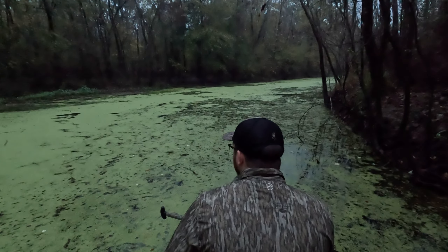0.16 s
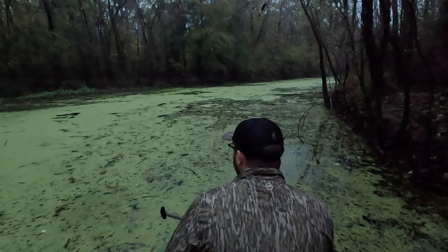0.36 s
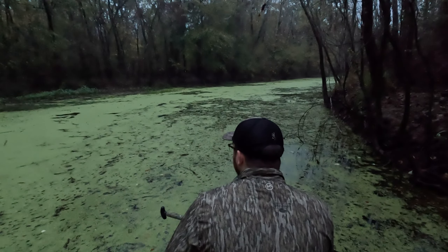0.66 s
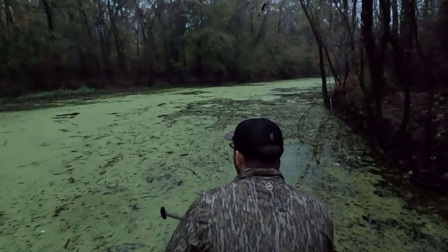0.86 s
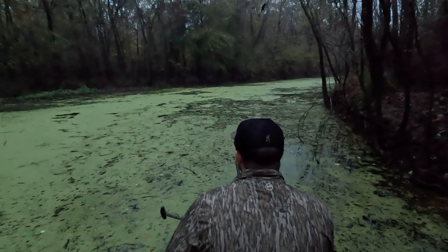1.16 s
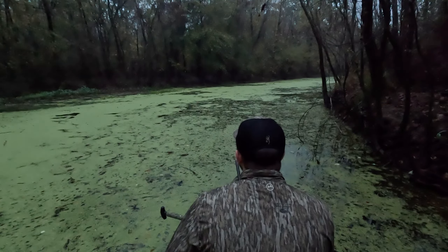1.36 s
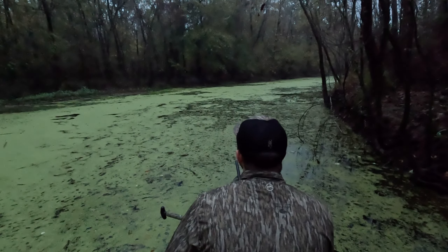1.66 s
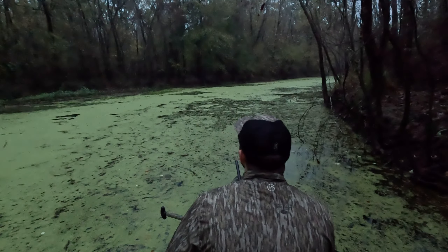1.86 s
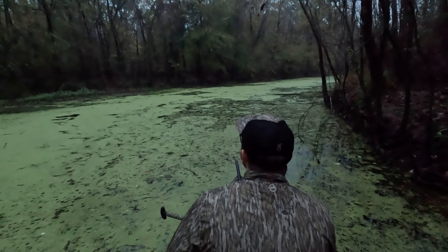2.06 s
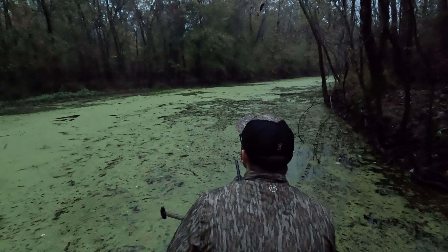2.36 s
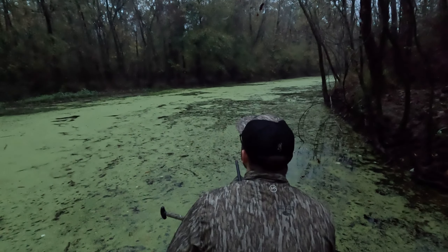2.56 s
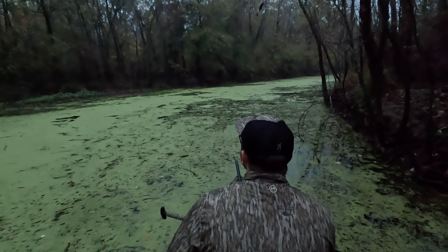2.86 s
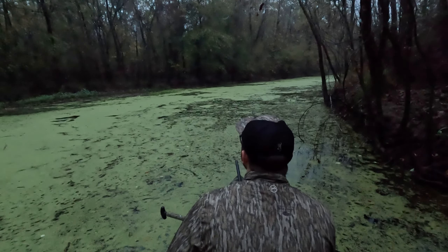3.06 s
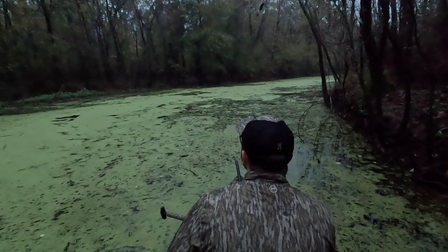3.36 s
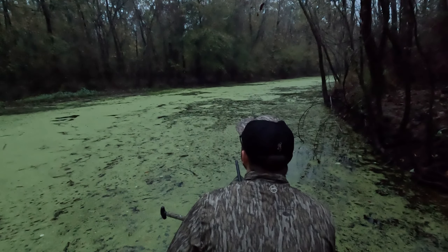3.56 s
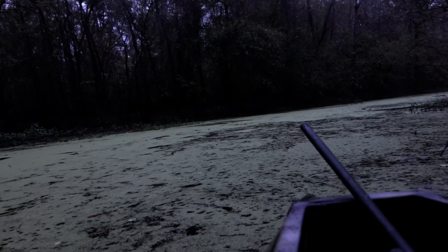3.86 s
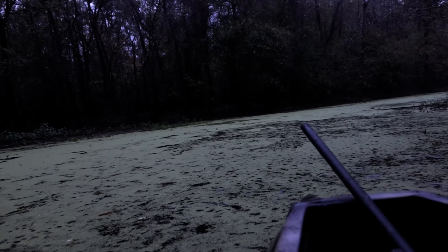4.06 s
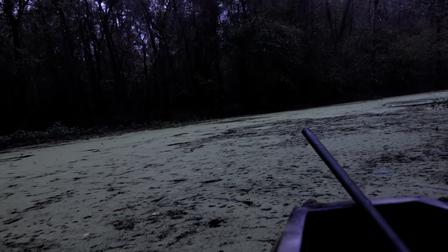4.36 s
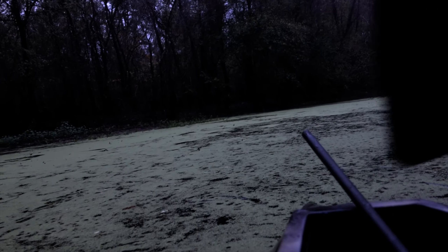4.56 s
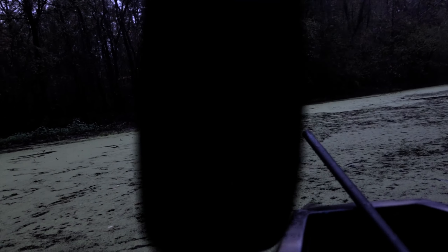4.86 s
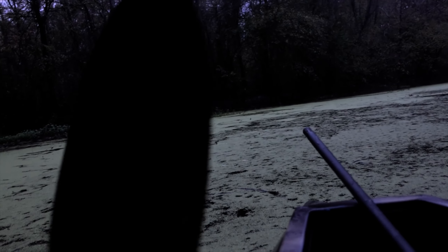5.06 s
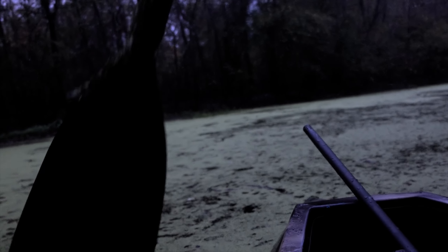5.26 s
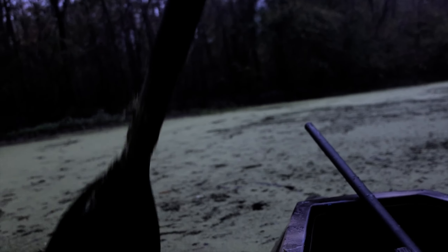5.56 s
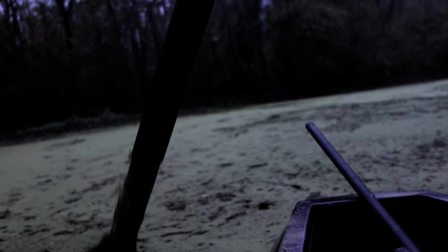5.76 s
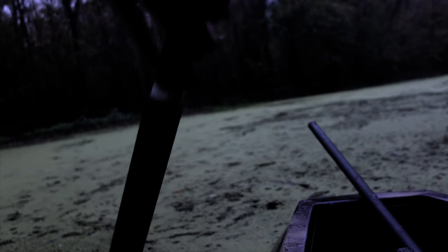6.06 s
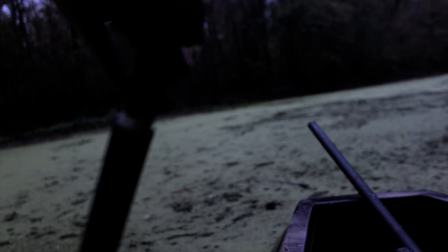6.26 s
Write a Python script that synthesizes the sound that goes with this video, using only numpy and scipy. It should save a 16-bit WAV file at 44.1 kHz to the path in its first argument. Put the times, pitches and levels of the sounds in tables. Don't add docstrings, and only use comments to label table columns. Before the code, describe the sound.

A shrill, steady cricket chorus fills a wooded swamp, heard almost mono through a sensitive distant microphone. Crows caw hoarsely, waterfowl whistle and honk, frogs grunt and sharp drops crack from leaves, with tree echoes. Just before four seconds it cuts to a much quieter, wide stereo boat view: cloth rustles, the paddle drips and splashes, water gurgles faintly, and the hollow hull is knocked, loudest near five and a half seconds.

```python
import sys
import numpy as np
from scipy import signal
from scipy.fft import rfft, irfft, next_fast_len
from scipy.io import wavfile

SR = 44100
rng = np.random.default_rng(int(sys.argv[2]) if len(sys.argv) > 2 else 0)


def pcm_store(signal):
    levels = np.round(np.clip(np.atleast_2d(signal), -1, 1) * 32767)
    wavfile.write(sys.argv[1], SR, levels.astype(np.int16).T)


def magnitude_from_level(level_db):
    exponent = np.asarray(level_db, float) / 20
    return 10 ** exponent


N = 282681
TIME = np.arange(N) / SR
CUT_S = 3.893
EDGE_DB = -4


def rms_one(x):
    return x / np.sqrt(np.mean(x ** 2) + 1e-20)


def in_time(rows):
    moments, *columns = np.transpose(rows)
    return [np.interp(TIME, moments, column) for column in columns]


def gate(start, end, edge):
    return np.clip(np.minimum(TIME - start, end - TIME) / edge, 0, 1)


def drift(rate):
    knots = signal.lfilter([1, 2, 1], [1], rng.standard_normal(800))
    return rms_one(np.interp(TIME * rate * 3 + 3, np.arange(800), knots))


def ring(clicks, hz, t60):
    radius = magnitude_from_level(-60 / (t60 * SR))
    angle = 2 * np.pi * min(hz, 16000) / SR
    return signal.lfilter([0, np.sin(angle)], [1, -2 * radius * np.cos(angle), radius ** 2], clicks + 1e-18)


def filtered(x, design):
    return signal.sosfilt(design, x)


def band(x, low_hz, high_hz):
    edges = [low_hz, min(high_hz, 17000)]
    return rms_one(filtered(x, signal.butter(3, edges, "band", fs=SR, output="sos")))


def placed(x, pan_db):
    return np.array([x * magnitude_from_level(pan_db / 2), x * magnitude_from_level(-pan_db / 2)])


def wide(pair, side_db):
    return pair[0] + magnitude_from_level(side_db) * pair[1] * [[1], [-1]]


# (delay [s], level [dB])
TREE_LINES = [(0.029, -5), (0.058, -8.5), (.092, -22), (0.139, -6.5)]


def trees(x):
    return x + sum(magnitude_from_level(db) * np.pad(x, (round(lag * SR), 0))[:N] for lag, db in TREE_LINES)


def air(spectrum, low_hz, high_hz, patchy_db):
    size = next_fast_len(N)
    hz = np.maximum(np.fft.rfftfreq(size, 1 / SR), 1)
    curve_hz, curve_db = np.transpose(spectrum)
    colour = magnitude_from_level(np.interp(np.log(hz), np.log(curve_hz), curve_db))
    inside = (hz > low_hz) & (hz < high_hz)
    colour = colour / np.sqrt(2 * np.sum(colour[inside] ** 2) / size)
    noise = rfft(rng.standard_normal((2, size))) * colour
    together, out = drift(6), 0
    for centre in 60 * 2. ** np.arange(0, 10, 1.5):
        octaves_off = np.log2(hz / centre)
        share = np.cos(np.clip(octaves_off / 1.5, -1, 1) * np.pi / 2) ** 2
        flicker = magnitude_from_level(patchy_db * (0.47 * together + drift(13)))
        out = out + irfft(noise * share, size)[:, :N] * flicker
    return out


# (frequency [Hz], level [dB per Hz])
FAR_AIR_COLOUR = [(20, -20), (55, -8.5), (110, -9), (190, -4), (300, -10.5), (700, -8.5), (950, -12.5),
                  (1400, -7.5), (3700, -11), (5600, -20), (7100, -25), (8700, -37), (13000, -36)]


def far_breeze():
    return magnitude_from_level(-56) * wide(air(FAR_AIR_COLOUR, 2300, 3700, patchy_db=.7), side_db=-38)


# (frequency [Hz], level [dB per Hz])
NEAR_AIR_COLOUR = [(30, -16), (146, -8.5), (260, -0.5), (560, 1.5), (1600, 1), (3700, -1.5), (5800, -2),
                   (10000, -5), (15500, -22)]


def near_air():
    return magnitude_from_level(-76) * wide(air(NEAR_AIR_COLOUR, 300, 2190, patchy_db=1.0), side_db=-6.5)


def chorus():
    centre_hz, spread_hz, strokes_per_s, tooth_t60 = 4754, 232, 55, 0.0062
    out = np.zeros((2, N))
    for k, (pitch, pace, start) in enumerate(zip(np.linspace(-2.6, 2.6, 26), *rng.random((2, 26)))):
        turns = start + strokes_per_s * (.8 + .4 * pace) * (TIME + 0.0059 * drift(5))
        stroke = np.clip(np.sin(2 * np.pi * turns) + 1.5, 0, None)
        faintness = 1 + pitch ** 2 + .4 * max(pitch, 0) ** 4
        teeth = stroke * rng.standard_normal(N) * magnitude_from_level(.4 * drift(6.2)) / faintness
        hz = centre_hz + spread_hz * pitch
        out[k % 2] += ring(ring(teeth, hz, tooth_t60), hz, tooth_t60)
    return np.array([rms_one(out[0] + out[1]), rms_one(out[0] - out[1])])


# (time [s], level [dB])
FAR_CHORUS_SWELL = [(0, -49), (1.04, -48.5), (2.54, -49), (3.08, -49), (3.89, -48.5)]


def far_chorus(crickets):
    level_db, = in_time(FAR_CHORUS_SWELL)
    return magnitude_from_level(level_db) * crickets[0]


# (time [s], level [dB], left over right [dB])
NEAR_CHORUS_SWELL = [(3.95, -65.5, 2), (4.5, -64, 1), (5.07, -65, 3.5), (5.3, -63, 2), (5.74, -64.5, 3),
                     (6.41, -66, 2)]


def near_chorus(crickets):
    level_db, pan_db = in_time(NEAR_CHORUS_SWELL)
    return wide(crickets, side_db=-10) * placed(magnitude_from_level(level_db), pan_db)


# (time [s], peak [dB])
WHIRR_SWELLS = [(3.04, -69), (3.2, -74), (3.35, -73), (3.62, -79)]


def whirr():
    swells = sum(magnitude_from_level(db) * np.exp(-((TIME - s) / 0.025) ** 2) for s, db in WHIRR_SWELLS)
    bed = magnitude_from_level(-78) * gate(2.8, 3.75, .09)
    return (bed + swells) * band(rng.standard_normal(N), 6400, 8100)


def patter():
    per_s, smear_s = 16, 0.0046
    strength = magnitude_from_level(1.3 * np.minimum(rng.exponential(1, N), 3))
    clicks = (rng.random(N) < per_s / SR) * strength
    smear = signal.lfilter([1], [1, -np.exp(-1 / (smear_s * SR))], clicks)
    return magnitude_from_level(-84.5) * rms_one(smear * band(rng.standard_normal(N), 5500, 14500))


def phrase(start, length, level_db, attack, release, edge_db):
    end = start + length
    return [(start, level_db + edge_db), (start + attack, level_db),
            (end - release, level_db), (end, level_db + edge_db)]


# (start [s], length [s], level [dB])
TRILLS = [(.0, 0.58, -52.5), (2.467, 0.57, -50), (5.722, 0.44, -70)]


def solo_cricket(depth, wobble_hz):
    tone_hz, pulses_per_s, beat_s, sag_hz_per_s = 4112, 38.9, 5.814, 110
    pulses = np.clip(np.cos(2 * np.pi * pulses_per_s * (TIME - beat_s)) + 1 / depth, 0, None)
    sag = sag_hz_per_s * sum(np.clip(TIME - s, 0, length) * (TIME < s + length) for s, length, _ in TRILLS)
    phase = 2 * np.pi * np.cumsum(tone_hz - sag + wobble_hz * drift(40)) / SR
    tone = rms_one(pulses * np.sin(phase))
    out = 0
    for start, length, db in TRILLS:
        level_db, = in_time(phrase(start, length, db, attack=.08, release=0.35, edge_db=-10))
        out = out + tone * gate(start, start + length, 0.01) * magnitude_from_level(level_db)
    return out


def low_notes(rows, swell_s, octave):
    out = 0
    for s, peak_db, hz in rows:
        age = np.clip(TIME - s + 0.01, 0, None)
        swell = age / swell_s * np.exp(1 - age / swell_s)
        note = np.sin(2 * np.pi * hz * age) + octave * np.sin(4 * np.pi * hz * age)
        out = out + magnitude_from_level(peak_db - 1.5) * swell * note
    return out


# (time [s], peak [dB], pitch [Hz])
FROG_GRUNTS = [(0.427, -49.5, 157.6), (1.518, -57.5, 193.5), (2.114, -59, 212), (2.634, -59.5, 116),
               (2.779, -53.5, 241.3), (2.8, -51.5, 154), (1.81, -58, 202), (3.25, -60, 188),
               (3.441, -58, 198)]


def frogs():
    return low_notes(FROG_GRUNTS, swell_s=0.017, octave=0.71)


def clear_calls(calls, tones, heard, wobble_hz):
    out = 0
    for rows in calls:
        hz, level_db = in_time(rows)
        phase = 2 * np.pi * np.cumsum(hz / heard + wobble_hz * drift(30)) / SR
        voice = 0
        for multiple, db in tones:
            flicker_db = 2.2 * (multiple > 1) * drift(34.98)
            voice = voice + magnitude_from_level(db + flicker_db) * np.sin(multiple * phase)
        loudness = magnitude_from_level(level_db + wobble_hz / 6 * drift(25))
        out = out + np.sqrt(2) * voice * loudness * gate(rows[0][0], rows[-1][0], .01)
    return out


def pitched(s, hz, levels):
    return np.transpose([s, hz, np.interp(s, *np.transpose(levels))])


def reedy(start, length, hz, level_db, fall_hz):
    fall_s = 0.057
    s = start + np.array([0, length / 3, length - fall_s, length])
    lift_hz = 30 * (fall_hz / 30 - 1)
    levels = phrase(start, length, level_db, length - fall_s, .015, EDGE_DB)
    return pitched(s, [hz - 15, hz + 18, hz + lift_hz, hz - fall_hz], levels)


# (start [s], length [s], held pitch [Hz], level [dB], closing fall [Hz])
REEDY_CALLS = [(1.02, .1, 1320, -52.5, 68), (1.89, .085, 1370, -50.5, 51), (1.45, .175, 1450, -50, 13),
               (2.372, .155, 1400, -48, 94.6)]
# (multiple [1], level [dB])
REEDY_OVERTONES = [(1, 0), (2, -12), (3, -19), (4, -21)]


def reedy_whistles():
    return clear_calls([reedy(*row) for row in REEDY_CALLS], REEDY_OVERTONES, heard=1, wobble_hz=5)


def honk(start, length, first_hz, last_hz, level_db):
    warble_hz, warbles_per_s, edge_s = 50.05, 12.5, .03
    age = np.linspace(0, length, num=40)
    rise = first_hz + (last_hz - first_hz) * age / length
    hz = rise - warble_hz * np.cos(2 * np.pi * warbles_per_s * age)
    return pitched(start + age, hz, phrase(start, length, level_db, edge_s, edge_s, EDGE_DB))


# (start [s], length [s], first [Hz], last [Hz], level [dB])
HONK_CALLS = [(.35, 0.17, 2055, 2134, -55.5), (1.141, .245, 1988, 2166, -55.5),
              (1.981, .24, 1664, 2180, -59)]
# (multiple [1], level [dB])
HONK_OVERTONES = [(1, -7), (2, -1), (3, 0), (4, -15)]


def honks():
    return clear_calls([honk(*row) for row in HONK_CALLS], HONK_OVERTONES, heard=3, wobble_hz=8)


def arch(crest, hz, level_db, after):
    rise_s, rise_hz, fall_s, fall_hz, sag_hz_per_s, tail_db = .038, 300, .07, 240, 900, -9
    age = np.linspace(-rise_s, after, num=40)
    rise = rise_hz * (np.minimum(age, 0) / rise_s) ** 2
    fall = fall_hz * np.sin(np.pi / 2 * np.clip(age / fall_s, 0, 1)) ** 2
    sag = sag_hz_per_s * np.clip(age - fall_s / 2, 0, None)
    levels = level_db + tail_db * np.clip(age / fall_s - .5, 0, 2) / 1.1
    return np.transpose([crest + age, hz - rise - fall - sag, levels])


# (crest time [s], crest pitch [Hz], level [dB], crest to end [s])
PURE_CALLS = [
    (2.871, 1405, -58, 0.042),
    (3.232, 1435, -51, 0.2),
    (3.684, 1431, -52, 0.068),
]
# (multiple [1], level [dB])
PURE_OVERTONES = [(1, 1.5), (2, -18)]


def pure_whistles():
    return clear_calls([arch(*row) for row in PURE_CALLS], PURE_OVERTONES, heard=1, wobble_hz=3)


def caw(start, length, hz, level_db):
    attack, release = min(.025, length / 2), min(.04, length / 2)
    levels = phrase(start, length, level_db, attack, release, EDGE_DB)
    sag = .1 * np.array([.5, 0.0031, .5, 1])
    return pitched([s for s, _ in levels], hz * (1 - sag), levels)


# (start [s], length [s], second partial [Hz], level [dB])
CROW_CAWS = [(0.072, 0.28, 1329, -55), (.51, 0.1, 1447, -50), (.61, 0.11, 1300, -46.5),
             (0.723, 0.075, 1428, -48), (1.0, .14, 1271, -51), (1.125, 0.17, 1301, -49),
             (1.178, 0.072, 1480, -55.5), (1.418, .18, 1282, -48.5), (1.619, 0.22, 1449, -55.5),
             (1.869, .12, 1330, -49.5), (1.981, 0.15, 1264, -54), (2.147, 0.25, 1480, -56.5),
             (3.4, 0.055, 1275, -54)]
# (frequency [Hz], width [Hz], level [dB])
THROAT = [(657, 160, -17.5), (1362, 345, 0), (1800, 250, -6), (2400, 400, -20.5)]


def crows(rough):
    out, breath = 0, rng.standard_normal(N)
    for rows in [caw(*row) for row in CROW_CAWS]:
        hz, level_db = in_time(rows)
        turns = np.cumsum(hz / 2 * (1 + .025 * drift(25))) / SR
        pulses = np.diff(np.floor(turns), prepend=0) * magnitude_from_level(5.0 * drift(40))
        source = pulses + rough * breath * (turns % 1 < .4)
        voice = 0
        for f, width, db in THROAT:
            voice = voice + magnitude_from_level(db) * rms_one(ring(ring(source, f, 3.1 / width), f, 3.1 / width))
        out = out + rms_one(voice) * magnitude_from_level(level_db) * gate(rows[0][0], rows[-1][0], 0.012)
    return out


def drops(rows):
    out = np.zeros((2, N))
    age = np.arange(2000) / SR
    for s, peak_db, low_hz, high_hz, ring_s, pan_db in rows:
        at = round(s * SR)
        burst = rng.standard_normal(2000) * np.exp(-age / ring_s) + 3.0 * (age == 0)
        crack = band(burst, low_hz, high_hz)
        out[:, at:at + 2000] += placed(magnitude_from_level(peak_db) * crack / np.abs(crack).max(), pan_db)
    return out


# (time [s], peak [dB], lowest [Hz], highest [Hz], left over right [dB])
LEAF_FALLS = [(.028, -41.5, 2620, 2850, 2), (.297, -40, 2870, 3600, 0), (.645, -41, 2000, 3805, -0.5),
              (0.7506, -38, 2985, 3900, 0), (0.8744, -38, 3440, 4330, 0), (1.2615, -50, 3360, 3880, 2),
              (1.285, -53, 6000, 12000, 2), (1.355, -53, 5500, 12000, 2), (1.871, -49, 5500, 12000, 1),
              (2.03, -57, 7040, 11870, 2), (2.694, -38.5, 2500, 3750, 0), (2.7611, -33.5, 2220, 6064, 1),
              (2.815, -56, 1970, 3500, 0), (2.875, -48, 5200, 6300, 0), (3.0, -49, 6000, 12000, -2),
              (3.535, -43, 2115, 2850, 2), (3.62, -46, 2480, 3110, 0)]


def leaf_drops():
    rows = []
    for s, db, low, high, pan in LEAF_FALLS:
        rows.append((s, db, low, high, max(3.8 / (high - low), 0.0011), pan))
    return drops(rows)


# (frequency [Hz], level [dB per Hz])
CLOTH_COLOUR = [(2000, -34), (5000, -9), (9000, -1.5), (14000, 1.5), (16000, -2.5)]
# (time [s], level [dB])
CLOTH_RUB = [(3.93, -73), (4.09, -69.5), (4.31, -67), (4.55, -75), (4.85, -77), (5.34, -72.5), (5.65, -80),
             (5.85, -82), (6.41, -75.5)]


def cloth():
    rub_db, = in_time(CLOTH_RUB)
    rustle = magnitude_from_level(rub_db - 1.5) * wide(air(CLOTH_COLOUR, 9800, 15900, patchy_db=1.1), side_db=-8)
    wake = np.clip((TIME - CUT_S) / 0.17, 0, 1) ** 2
    sheen = magnitude_from_level(-87.5 + 0.4 * (rub_db + 73)) * wake
    hiss = [band(v, 12500, 16500) * magnitude_from_level(0.92 * drift(10)) for v in rng.standard_normal((2, N))]
    return rustle + sheen * wide(hiss, side_db=-8)


# (time [s], peak [dB], pitch [Hz])
HULL_GURGLES = [(4.449, -77, 252), (5.178, -68, 283), (5.575, -74, 318), (5.735, -76, 240),
                (5.765, -73.5, 266), (5.805, -75, 248)]


def gurgles():
    return low_notes(HULL_GURGLES, swell_s=0.011, octave=0.45)


# (time [s], peak [dB], lowest [Hz], highest [Hz])
PADDLE_DRIPS = [(4.135, -62, 1500, 2800), (4.268, -51, 4970, 6500), (4.357, -55, 8450, 10500),
                (4.5924, -62, 11500, 13500), (4.6384, -50, 5500, 9000), (5.0195, -51, 1000, 15800),
                (5.0905, -48, 5500, 15800), (5.146, -54, 4000, 8000), (5.2408, -47, 2000, 15800),
                (5.294, -45.5, 5240, 6600), (5.2935, -46, 8000, 13000), (5.3133, -44, 7500, 10400),
                (5.4917, -39, 450, 1800), (5.497, -43.5, 500, 2400), (5.531, -47.5, 4600, 5900),
                (5.531, -56, 1900, 4000), (5.984, -54, 1800, 3300), (6.1714, -52, 3000, 13000),
                (6.256, -60, 2500, 3400), (6.35, -60, 10500, 12500)]
# (time [s], peak [dB])
BLADE_SPRAY = [(4.7954, -56), (4.8358, -56), (4.8775, -52), (5.195, -48), (5.202, -55), (5.215, -56),
               (5.3636, -58), (5.369, -52), (5.48, -54), (5.545, -56), (5.83, -62)]


def paddle_drips():
    spray = [(s, db, 9400, 15800) for s, db in BLADE_SPRAY]
    ring_s, pan_db = 0.0019, 2.5
    return drops([(*row, ring_s, pan_db) for row in [*PADDLE_DRIPS, *spray]])


# (time [s], peak [dB], t60 [s], bubble start pitch [Hz], bubble level [dB])
BLADE_SPLASHES = [
    (5.0185, -51, .05, 904, -84),
    (5.149, -40, 0.087, 786, -63.5),
]


def splashes():
    out, white = 0, rng.standard_normal((2, N))
    cavity = rms_one(ring(white[0], 1430, 0.0047))
    body = rms_one(band(white[0], 730, 3000) + 0.14 * band(white[1], 230, 750) + 0.31 * cavity)
    hiss = rms_one(band(white[1], 3000, 21600) + 0.55 * band(white[1], 10000, 20000))
    for s, peak_db, t60, hz, bubble_db in BLADE_SPLASHES:
        age = np.clip(TIME - s, 0, None)
        out = out + magnitude_from_level(peak_db - 70 * age / t60) * np.clip(age / 0.0063, 0, 1) * body
        out = out + magnitude_from_level(peak_db + 1.3 - 85 * age / t60) * np.clip(age / 0.0012, 0, 1) * hiss
        turns = np.cumsum(hz * (1 + (np.minimum(age, .1) / .068) ** 4)) / SR
        bubble = np.sin(2 * np.pi * turns) * gate(s + .024, s + .07, .015)
        out = out + magnitude_from_level(bubble_db) * bubble * magnitude_from_level(drift(40))
    out = filtered(out, signal.butter(2, 250, "high", fs=SR, output="sos"))
    return wide([out, np.roll(out, 9)], side_db=-15)


# (time [s], peak [dB], damping [0-1])
HULL_KNOCKS = [
    (4.324, -45, 1),
    (4.782, -48, 0.65),
    (5.4913, -34, 0),
    (5.983, -47, 0.75),
    (6.171, -41.5, 0.86),
    (6.234, -59, 0.5),
]
# (frequency [Hz], level [dB], t60 [s])
HULL_MODES = [(570, -18, 0.03), (720, -10.5, 0.11), (1070, 3.5, 0.064), (1435, 2.5, 0.036),
              (1870, -21, 0.13), (2160, 1, 0.034)]


def knocks():
    out = 0
    for s, peak_db, damping in HULL_KNOCKS:
        click = np.zeros(N)
        click[round(s * SR)] = magnitude_from_level(peak_db - 16.5)
        keep = 1 - np.clip(damping, 0, .9)
        for hz, db, t60 in HULL_MODES:
            out = out + magnitude_from_level(db + rng.normal(0, 0.99)) * ring(click, hz, t60 * keep)
    out = filtered(out, signal.butter(5, [420, 2500], "band", fs=SR, output="sos"))
    return placed(out, pan_db=1.5)


def far_bank(crickets):
    birds = reedy_whistles() + honks()
    pure = pure_whistles()
    far = far_breeze() + far_chorus(crickets) + whirr() + patter()
    far = far + magnitude_from_level(-6.0) * trees(solo_cricket(depth=0.45, wobble_hz=70))
    far = far + frogs() + leaf_drops()
    far = far + .65 * birds + magnitude_from_level(-10) * trees(birds)
    far = far + pure + magnitude_from_level(-7.5) * trees(pure)
    far = far + magnitude_from_level(-3) * trees(crows(rough=.55))
    far = filtered(far, signal.butter(2, [8950, 9250], "stop", fs=SR, output="sos"))
    return filtered(far, signal.cheby2(8, 45, 14000, fs=SR, output="sos"))


def in_boat(crickets):
    lone = solo_cricket(depth=3.5, wobble_hz=14)
    near = near_air() + near_chorus(crickets) + placed(lone + .3 * trees(lone), pan_db=8)
    return near + cloth() + gurgles() + paddle_drips() + splashes() + knocks()


def scene():
    crickets = chorus()
    fade_in = np.clip((TIME - CUT_S) / .045, 0, 1)
    return far_bank(crickets) * (TIME < CUT_S) + in_boat(crickets) * fade_in


def low_pass(x):
    return signal.sosfilt(signal.butter(12, 16650, fs=SR, output="sos"), x)


def record(dry):
    mix = filtered(dry, signal.ellip(10, 1, 70, 15850, fs=SR, output="sos"))
    return low_pass(mix)


dry = scene()
out = record(dry)
pcm_store(out)
```